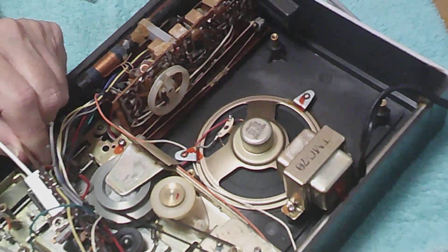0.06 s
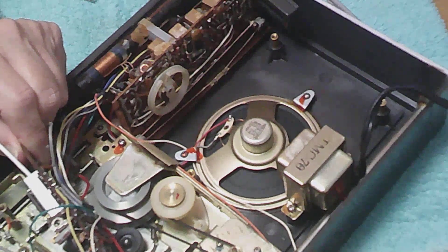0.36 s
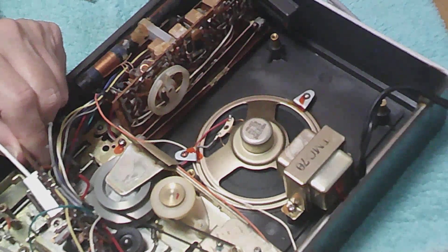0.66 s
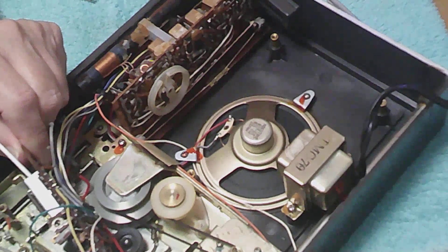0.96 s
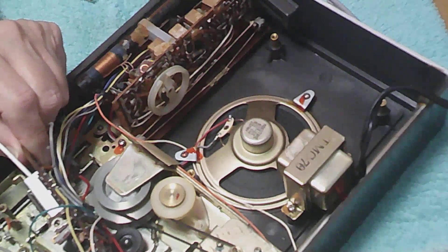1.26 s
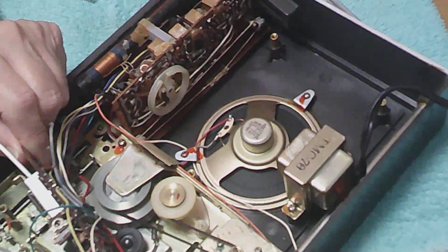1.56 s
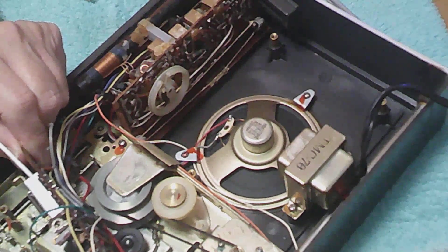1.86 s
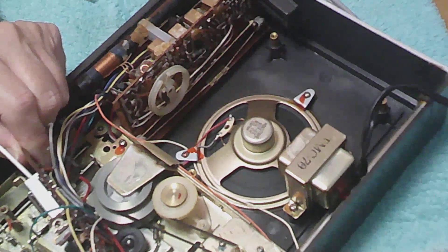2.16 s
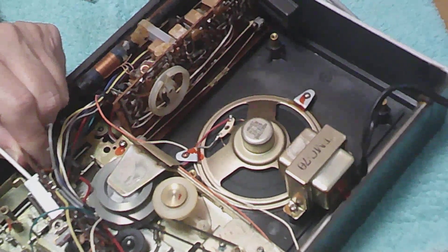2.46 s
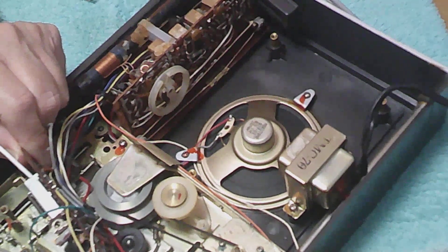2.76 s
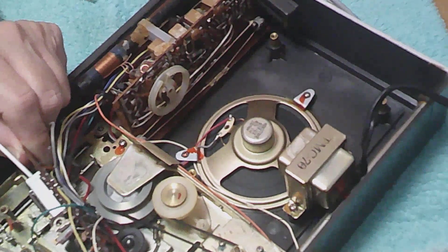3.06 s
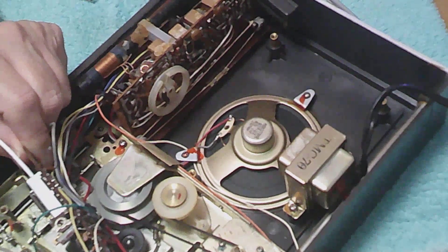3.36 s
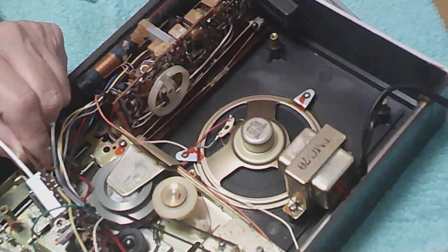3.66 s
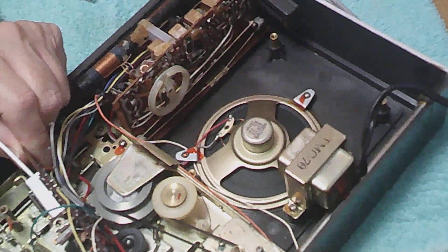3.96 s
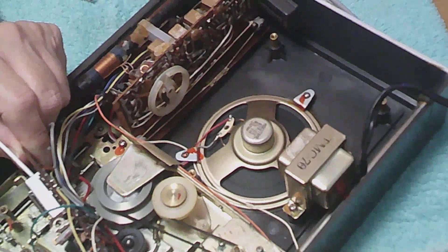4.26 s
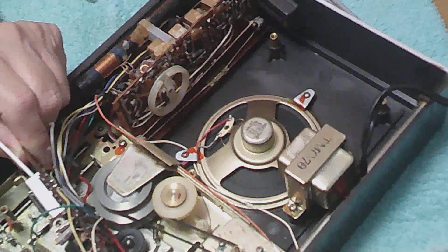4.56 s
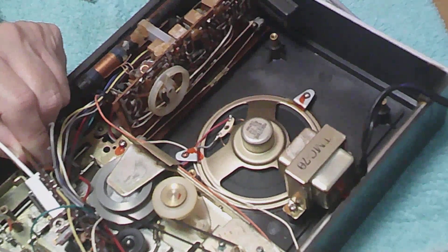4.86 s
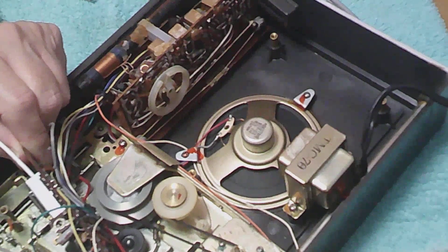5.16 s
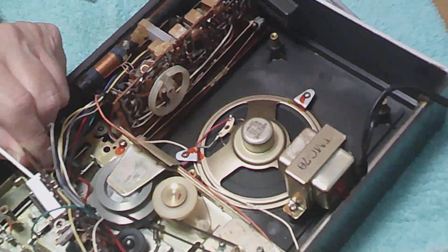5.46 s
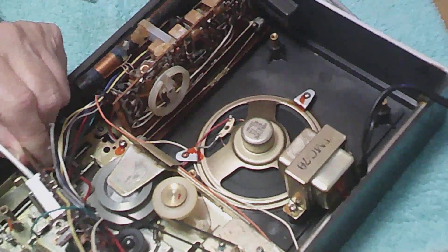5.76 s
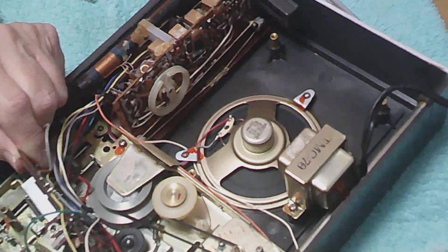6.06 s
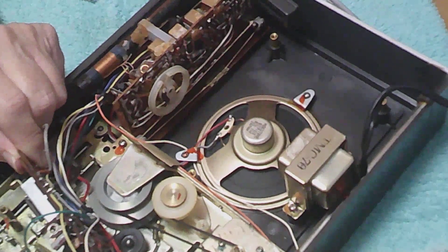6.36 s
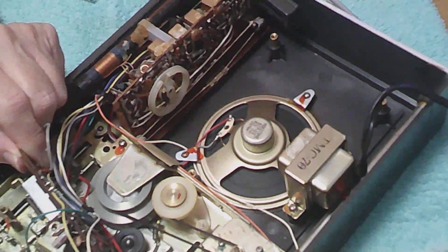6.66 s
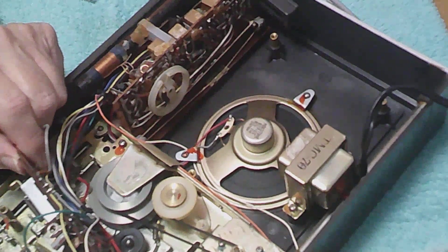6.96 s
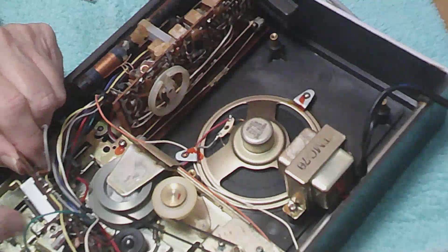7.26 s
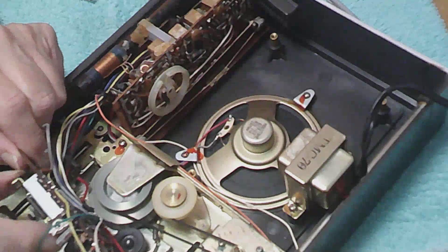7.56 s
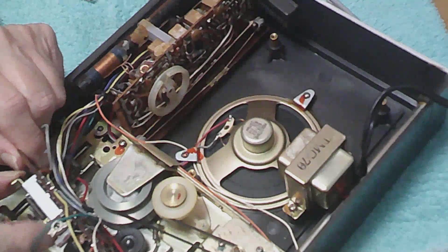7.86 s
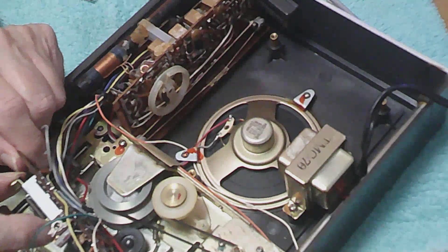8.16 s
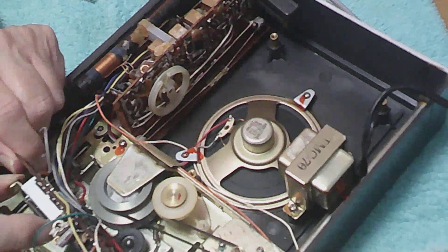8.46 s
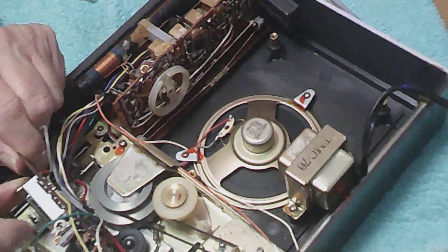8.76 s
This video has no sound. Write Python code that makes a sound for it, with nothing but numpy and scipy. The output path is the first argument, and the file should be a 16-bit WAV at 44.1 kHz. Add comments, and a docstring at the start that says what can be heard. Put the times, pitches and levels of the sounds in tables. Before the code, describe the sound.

Two short sizzles of a soldering iron, faint ticks and scrapes, then a tool knocks down on a workbench over a low hum.

```python
"""Soldering at a switch inside an opened tape player, on a workbench in a small room. A faint hum runs from the
start, and tool and wires tick (impact) and scrape (stick-slip) on the contacts. At 2.2 s and again at 5.3 s
flux boils under the hot tip: bursting bubbles sizzle, the solder lug rings in squeals. At 6.4 s and 6.7 s the
tool is put down with two knocks that excite the modes of the bench top. A few last ticks and scrapes follow.
All is heard through a microphone that resonates in the treble."""
import sys
import numpy as np
from scipy import signal
from scipy.fft import rfft, irfft
from scipy.io import wavfile

SR = 44100
rng = np.random.default_rng(int(sys.argv[2]) if len(sys.argv) > 2 else 0)


def waveform_to_disk(signal):
    """Save audio, clipped to [-1, 1], as 16-bit WAV at the path in sys.argv[1]."""
    frames = np.transpose(np.atleast_2d(signal))
    scaled = np.clip(frames, -1, 1) * 32767
    samples = np.round(scaled).astype(np.int16)
    wavfile.write(sys.argv[1], SR, samples)


N = 397341
TIME = np.arange(N) / SR
# spectrum of spitting and fizzing flux: frequency_hz, gain_db
SPIT_SPECTRUM = [(300, -12), (1000, -8.5), (3000, -10), (4500, -8), (6000, -9), (7000, 3), (8100, -6),
                 (9200, -1.5), (10500, -16), (16000, -10)]


def from_db(db):
    """Decibel scale: 20 dB is a factor of ten in amplitude."""
    return 10 ** (np.asarray(db) / 20)


def rms_one(x):
    """Normalisation to unit mean power."""
    return x / np.sqrt(np.mean(x ** 2) + 1e-20)


def at_hz(points, hz):
    """Interpolation on a logarithmic frequency axis."""
    known_hz, values = np.transpose(points)
    return np.interp(np.log(np.maximum(hz, 1)), np.log(known_hz), values)


def colour(x, spectrum, size=8192):
    """Minimum-phase filtering: folding the cepstrum gives a causal response with the given gains."""
    gains = from_db(at_hz(spectrum, np.arange(size // 2 + 1) * SR / size))
    cepstrum = irfft(np.log(gains))
    cepstrum[1:size // 2] *= 2
    cepstrum[size // 2 + 1:] = 0
    return convolve(x, irfft(np.exp(rfft(cepstrum))))


def convolve(x, response):
    """Convolution: each sample sets off a scaled copy of the impulse response."""
    return signal.oaconvolve(x, response)[:N]


def impulses(times_s, levels_db):
    """Ideal impacts: one sample each, with a flat spectrum."""
    out = np.zeros(N)
    out[np.round(np.asarray(times_s) * SR).astype(int)] = from_db(levels_db)
    return out


def shot_noise(spectrum, per_s, spread_db):
    """Shot noise: random impulses of uneven size, filtered and scaled to unit rms."""
    sizes = from_db(spread_db * np.minimum(rng.exponential(1, N), 4))
    signs = rng.choice([-1, 1], N)
    occurs = rng.random(N) < per_s / SR
    return rms_one(colour(sizes * signs * occurs, spectrum))


def wavering(hz, rms_db, width_hz):
    """Phase diffusion: a random walk of phase broadens a tone into a narrow band."""
    jitter = rng.standard_normal(N) * np.sqrt(2 * np.pi * width_hz / SR)
    return from_db(rms_db) * np.sqrt(2) * np.sin(np.cumsum(2 * np.pi * hz / SR + jitter))


def ringing(modes):
    """Modal superposition: a struck body answers with one damped sine for each mode."""
    t = TIME[:SR // 2]
    return sum(from_db(db) * np.sin(2 * np.pi * hz * t) * np.exp(-np.log(1000) * t / t60_s)
               for hz, db, t60_s in modes)


def room(x, wet_db, build_s, bands=9):
    """Reverberation: direct sound, two early reflections and a diffuse tail that decays band by band."""
    # reflections from nearby surfaces: delay_s, level_db
    reflections = [(.0064, -14), (.0098, -15)]
    # reverberation time: frequency_hz, t60_s
    decay_times = [(150, 0.36), (1000, 0.27), (3000, 0.28), (7000, 0.23), (15000, 0.25)]
    t = TIME[:SR // 2]
    hz = np.arange(len(t) // 2 + 1) * SR / len(t)
    noise, tail = rfft(rng.standard_normal(len(t))), 0
    edges_hz = np.geomspace(80, SR / 2, bands + 1)
    for low, high in zip(edges_hz, edges_hz[1:]):
        band = irfft(noise * (hz >= low) * (hz < high), len(t))
        tail += band * np.exp(-np.log(1000) * t / at_hz(decay_times, np.sqrt(low * high)))
    tail *= 1 - np.exp(-(t / build_s) ** 2)
    response = from_db(wet_db) * tail / np.sqrt(np.sum(tail ** 2))
    response[0] = 1
    for delay_s, db in reflections:
        response[round(delay_s * SR)] += from_db(db)
    return convolve(x, response)


def noise_floor(rumble_db=-57.5, hiss_db=-77.0):
    """Stationary Gaussian noise: the room rumbles and the microphone hisses."""
    # spectral shapes of the two noises: frequency_hz, gain_db
    rumble_spectrum = [(20, -4.5), (35, -6), (65, -2.5), (110, -1.5), (170, -5), (240, -7), (330, -11),
                       (500, -15.5), (900, -19), (1600, -23.5), (2500, -26), (3500, -33.5), (5000, -47.5),
                       (8000, -61)]
    hiss_spectrum = [(1500, -6), (3500, -1), (5000, -2.5), (7000, -2.5), (9000, -4.5), (11000, -7.5),
                     (13500, -2), (16000, -2.5)]
    rumble = rms_one(colour(rng.standard_normal(N), rumble_spectrum))
    hiss = rms_one(colour(rng.standard_normal(N), hiss_spectrum))
    return from_db(rumble_db) * rumble + from_db(hiss_db) * hiss


def hum(drone_hz=135, resting_db=-71):
    """Line spectrum of mains and a motor; the strongest line, a low drone, slowly swells and fades."""
    # steady lines: pitch_hz, rms_db, width_hz
    lines = [(60.4, -68.5, 2.14), (178.8, -71, 1.93), (238.7, -75, 2.2), (299, -80, 2.35),
             (374.5, -72.5, 2.59), (1080, -78.5, 15.03), (1502, -80, 8.8), (1560, -85, 12)]
    # bell-shaped swells of the drone: middle_s, half_length_s, lift_db
    swells = [(.45, 0.67, 10), (4.9, 4.3, 7.5)]
    steady = sum(wavering(*line) for line in lines)
    lift_db = sum(db * np.exp(-((TIME - middle_s) / half_s) ** 2) for middle_s, half_s, db in swells)
    return steady + wavering(drone_hz, resting_db + lift_db, width_hz=2.7)


def scrapes():
    """Stick-slip friction: small metal parts rasp under the tool and the chassis adds a dull rub."""
    # strokes of the tool: start_s, length_s, rasp_db, rub_db
    strokes = [(1.223, 0.038, -56.5, -59), (1.527, 0.039, -75, -64.5), (1.972, 0.047, -74, -63),
               (5.072, 0.033, -65, -59.5), (5.258, 0.021, -59.5, -54.5), (5.279, 0.039, -48.5, -45),
               (6.14, .05, -70.5, -82), (6.687, 0.01, -70, -44.5), (7.48, .03, -75, -80),
               (8.31, 0.032, -73, -80), (8.59, 0.1, -79, -82), (8.848, 0.11, -76, -71)]
    # responses of the metal parts and the chassis: frequency_hz, gain_db
    rasp_spectrum = [(600, -9), (1500, 7), (2100, -5.5), (2750, 7), (3600, -5.5), (4100, 2), (4700, -10),
                     (5400, -6), (6500, 0.5), (8000, -6), (10000, -4), (11500, -13), (13300, -5),
                     (16000, -22)]
    rub_spectrum = [(80, -56), (190, 6.5), (500, 7), (900, 3), (1350, 3.5), (1800, -2.5), (2350, -4),
                    (3200, -38), (6000, -40)]
    rasp_level, rub_level = 0, 0
    for start_s, length_s, rasp_db, rub_db in strokes:
        progress = np.clip((TIME - start_s) / length_s, 0, 1)
        arch = np.sqrt(np.sin(np.pi * progress).clip(0))
        rasp_level += arch * from_db(rasp_db)
        rub_level += arch * from_db(rub_db)
    rasp = rasp_level * shot_noise(rasp_spectrum, per_s=4000, spread_db=7.0)
    rub = rub_level * shot_noise(rub_spectrum, per_s=3600, spread_db=1.0)
    return room(rasp + rub, wet_db=-7.0, build_s=0.015)


def chatter(x, feedback):
    """Multiple reflection in small metal parts: all-pass loops smear a click but keep its spectrum."""
    # echo loops in the metal: round_trip_s
    round_trips = [0.00017, .00029, .00052]
    for trip_s in round_trips:
        loop = np.r_[1, np.zeros(round(trip_s * SR)), -feedback]
        x = signal.lfilter(loop[::-1], loop, x + 1e-18)
    return x


def ticks_and_spits(gain_db=8.5, ring_db=-32.0):
    """Impulse excitation: touches of tool and wire ring the switch; spits of flux are thin and bright."""
    # touches on the contacts, and single spits of hot flux: start_s, level_db
    touch_events = [(.167, -42.5), (2.102, -52.5), (3.836, -44), (5.7181, -33), (5.845, -49), (7.057, -54),
                    (8.841, -54), (8.879, -34.5)]
    spit_events = [(1.805, -47.5), (2.2058, -19), (2.2068, -22.5), (2.2124, -29), (2.2325, -23.5),
                   (2.861, -45), (2.9455, -41), (5.374, -22.5), (5.650, -47)]
    # spectrum of a touch: frequency_hz, gain_db
    tick_spectrum = [(200, -4), (700, -4), (1400, -2), (2400, 1), (2900, -5.5), (3500, 3), (4500, -4.5),
                     (6700, 3.5), (8000, -7.5), (9300, 0), (12000, -10.5), (16000, -14)]
    # metal parts of the switch: pitch_hz, level_db, t60_s
    switch_modes = [(2750, 0, .04), (3500, -1, .04), (4120, 2, .04), (9300, 2, .06)]
    touches = impulses(*np.transpose(touch_events))
    pops = impulses(*np.transpose(spit_events))
    ticks = colour(chatter(touches, feedback=0.6), tick_spectrum)
    spits = colour(chatter(pops, feedback=0.31), SPIT_SPECTRUM)
    ring = from_db(ring_db) * convolve(touches, ringing(switch_modes))
    return room(from_db(gain_db) * (ticks + spits) + ring, wet_db=-2.0, build_s=0.0019)


def knocks(thud_db=17.0, bench_db=-3.5, edge_db=-12.0, tool_db=-48.0, radiate_hz=175):
    """Impact and free vibration: a dull blow rings the bench; the hard contact clacks and rings the tool."""
    # the tool lands, rocks and settles: start_s, level_db, hard_offset_db, cutoff_hz
    landings = [(6.4349, -3, -4.5, 6000), (6.4437, -26, -18, 700), (6.6987, -14.5, -13, 450),
                (6.707, -16.5, -15, 350), (6.730, -27, -20, 200)]
    # spectra of the dull blow and its bright edge: frequency_hz, gain_db
    thud_spectrum = [(40, -36), (100, -24), (190, 4), (300, -7), (400, 6), (650, 3.5), (1000, -1.5),
                     (1350, 1.5), (1700, -12.5), (2100, -10.5), (2900, -25), (4200, -62), (8000, -95)]
    edge_spectrum = [(1000, -35), (3000, 10), (4200, 0), (6000, -0.5), (6900, 3.5), (8200, -7), (9200, -1),
                     (11200, -1), (12000, 4.5), (13000, 1), (15100, 8), (16000, 15)]
    # modes of the bench top and the metal tool: pitch_hz, level_db, t60_s
    bench_modes = [(138, -56, 0.29), (165, -25, 0.19), (201, -35, 0.25), (269, -24.5, 0.26),
                   (352, -25.5, 0.23), (422, -21.5, 0.17), (464, -50, 0.24), (522, -42, 0.23),
                   (630, -14, 0.079), (704, -54, 0.31), (775, -33, 0.33), (813, -42, 0.26),
                   (863, -27, 0.19), (1000, -45, 0.21), (1058, -39.5, 0.52), (1090, -42, 0.34),
                   (1137, -44, 0.56), (1180, -28, 0.17), (1260, -39.5, 0.43), (1390, -25, 0.15),
                   (1445, -37, 0.17), (1890, -21, 0.045), (1990, -40, 0.12), (2075, -31.5, 0.14),
                   (2430, -47, 0.32), (2490, -37, .16)]
    tool_modes = [(6640, -4, 0.25), (9351, -11, 0.31), (11010, -7, 0.24), (12880, -15, 0.3),
                  (13380, -10, 0.2), (14710, 0, 0.16), (14890, -10, 0.36), (15260, -5, 0.2)]
    blows, contacts = 0, 0
    for start_s, db, hard_offset_db, cutoff_hz in landings:
        give = np.exp(-2 * np.pi * cutoff_hz / SR)   # a softer contact lasts longer and sounds duller
        blows += signal.lfilter([1 - give], [1, -give], impulses(start_s, db) + 1e-18)
        contacts += impulses(start_s, db + hard_offset_db)
    # the bench top hardly radiates its lowest motion
    radiation = signal.butter(2, radiate_hz, "high", fs=SR, output="sos")
    bench = from_db(bench_db) * convolve(blows, signal.sosfilt(radiation, ringing(bench_modes)))
    tool = from_db(tool_db) * convolve(contacts, ringing(tool_modes))
    thud = room(from_db(thud_db) * colour(blows, thud_spectrum), wet_db=-2.0, build_s=0.0022)
    edge = room(from_db(edge_db) * colour(contacts, edge_spectrum), wet_db=3.5, build_s=0.00064)
    return thud + bench + edge + tool


def squeals():
    """Resonance of the solder lug: the hot lug rings in short squeals whose pitch glides."""
    # squeals of the ringing lug: start_s, length_s, start_hz, end_hz, level_db
    lug_squeals = [(2.269, 0.054, 3660, 3480, -57), (2.392, 0.054, 3570, 3720, -71),
                   (5.327, 0.039, 4120, 3780, -58), (5.432, 0.059, 3520, 3530, -60)]
    out = 0
    for start_s, length_s, start_hz, end_hz, db in lug_squeals:
        progress = np.clip((TIME - start_s) / length_s, 0, 1)
        pitch_hz = start_hz + (end_hz - start_hz) * progress
        out += np.sin(np.pi * progress) * wavering(pitch_hz, db, width_hz=120)
    return out


def boil_envelope(sag_db_per_s=10, dry_db_per_s=149):
    """Two-stage exponential decay: each boil wells up, sags slowly, then dies fast as the flux dries."""
    # a boil at each touch of the tip, then a weaker flare: start_s, attack_s, hold_s, level_db
    boils = [(2.2034, .003, 0.098, -41), (2.401, 0.021, 0.024, -55.5), (5.262, 0.065, 0.13, -43),
             (5.555, 0.032, .02, -67)]
    out = 0
    for start_s, attack_s, hold_s, db in boils:
        age_s = TIME - start_s
        rise = np.clip(age_s / attack_s, 0, 1) ** 2
        sag_db = sag_db_per_s * np.clip(age_s - attack_s, 0, hold_s)
        drying_db = dry_db_per_s * np.maximum(age_s - attack_s - hold_s, 0)
        out += rise * from_db(db - sag_db - drying_db)
    return out


def boiling_flux(sizzle_db=-7.0, fizz_db=-30.5, linger=0.68):
    """Thousands of bubble bursts a second sum to shot noise; a thin fizz outlasts the hard boil."""
    # spectrum of the bursting bubbles: frequency_hz, gain_db
    sizzle_spectrum = [(200, 1), (600, -3), (1200, -5), (2200, -1), (3000, 0), (4200, -2), (5200, 1.5),
                       (5800, 2.5), (6600, 5), (9000, 2), (10000, -1), (12000, -8.5), (16000, -6)]
    boil = boil_envelope()
    sizzle = from_db(sizzle_db) * boil * shot_noise(sizzle_spectrum, per_s=6000, spread_db=3.5)
    fizz = from_db(fizz_db) * boil ** linger * shot_noise(SPIT_SPECTRUM, per_s=2800, spread_db=5.5)
    return room(sizzle + fizz + squeals(), wet_db=-9.0, build_s=0.019)


def scene():
    """Superposition: all sources at the bench add in one channel."""
    return (noise_floor() + hum() + scrapes() + ticks_and_spits() + knocks() + boiling_flux())[None]


def record(dry, cutoff_hz=15750):
    """Two-pole resonances of the microphone lift or cut treble bands; a steep low-pass removes the top."""
    # peaks and dips of the microphone: centre_hz, width_hz, gain_db
    resonances = [(6810, 820, 5.5), (8000, 880, 1), (9150, 810, 6), (10400, 470, -1.5), (10650, 500, 2.5),
                  (15100, 900, -2.5)]
    for centre_hz, width_hz, gain_db in resonances:
        radius = np.exp(-np.pi * width_hz / SR)
        numerator = np.array([1, 0, -1]) * (1 - radius ** 2) / 2
        denominator = [1, -2 * radius * np.cos(2 * np.pi * centre_hz / SR), radius ** 2]
        band = signal.lfilter(numerator, denominator, dry + 1e-18)
        dry = dry + (from_db(gain_db) - 1) * band
    return signal.sosfilt(signal.ellip(10, .1, 70, cutoff_hz, fs=SR, output="sos"), dry)


dry = scene()
out = record(dry)
waveform_to_disk(out)
```